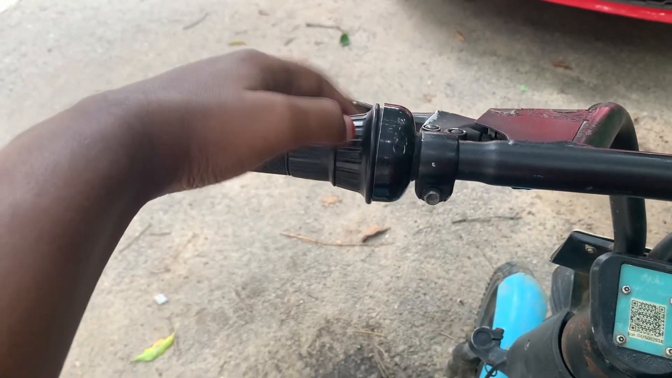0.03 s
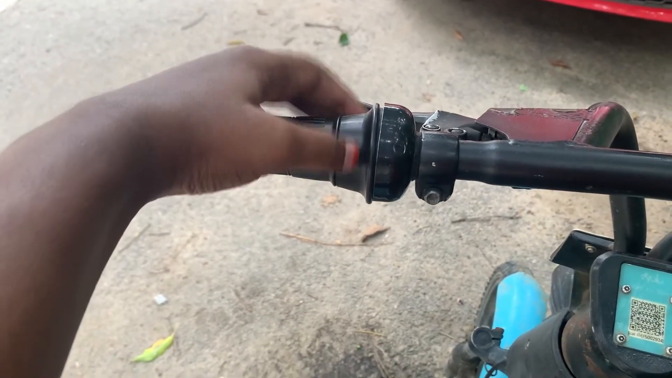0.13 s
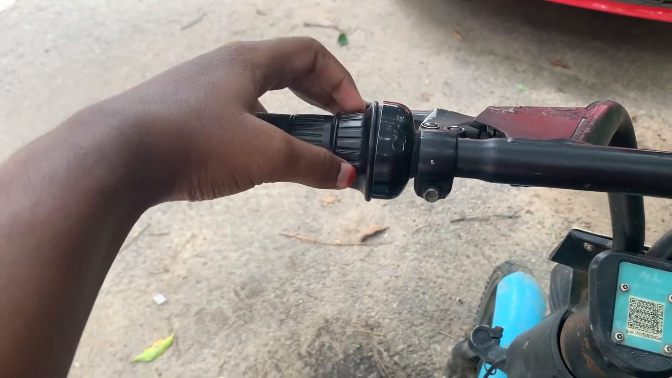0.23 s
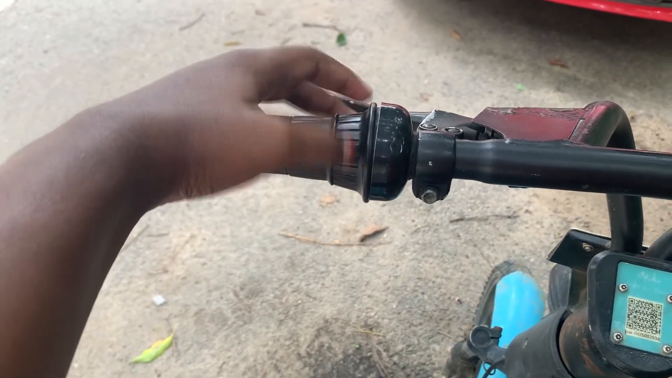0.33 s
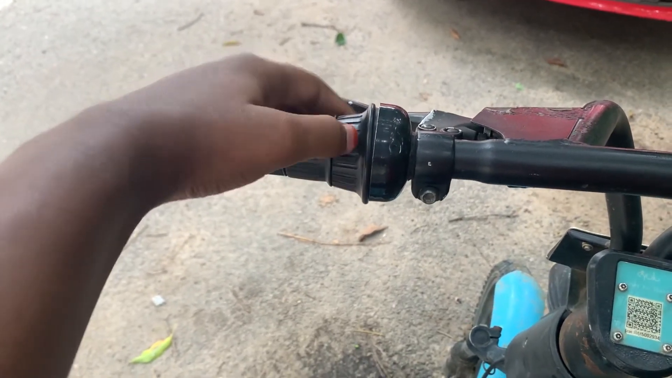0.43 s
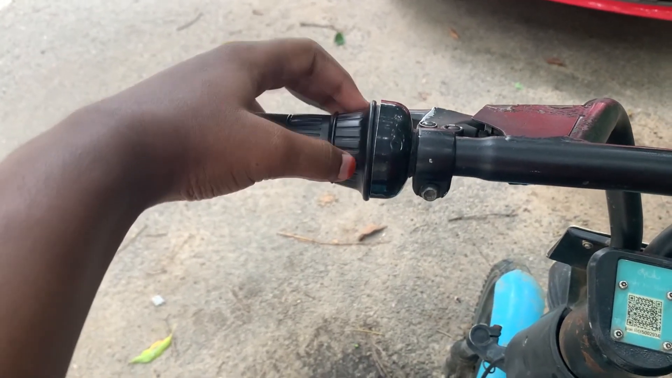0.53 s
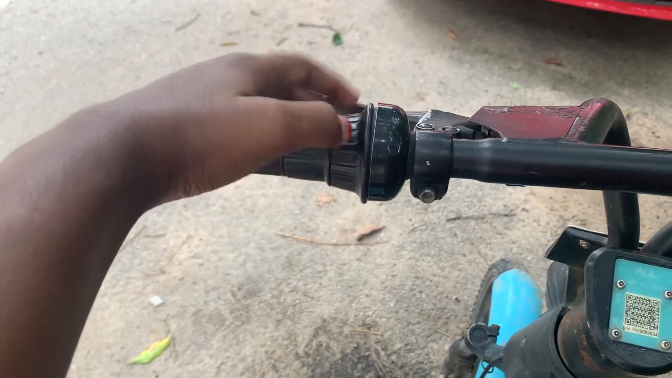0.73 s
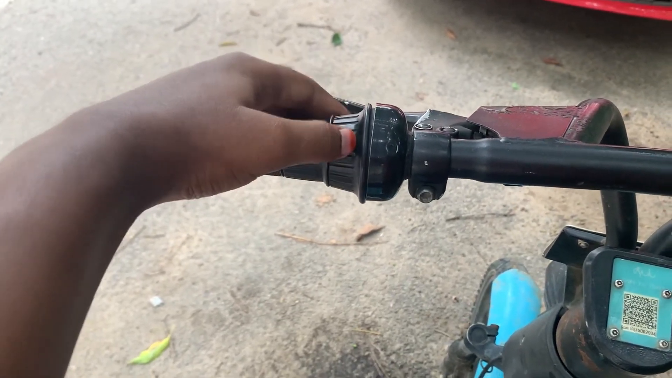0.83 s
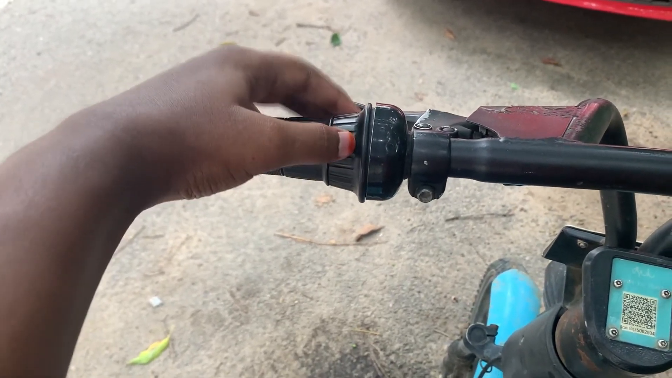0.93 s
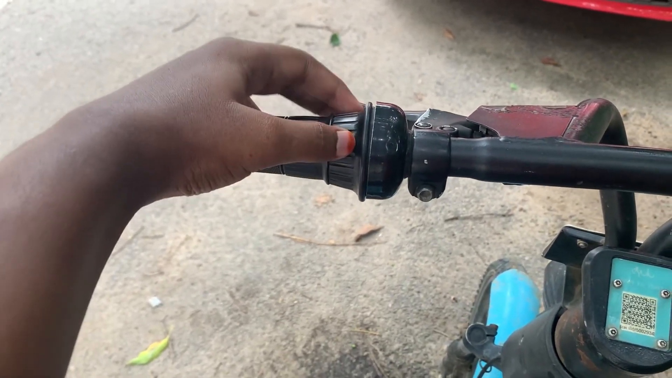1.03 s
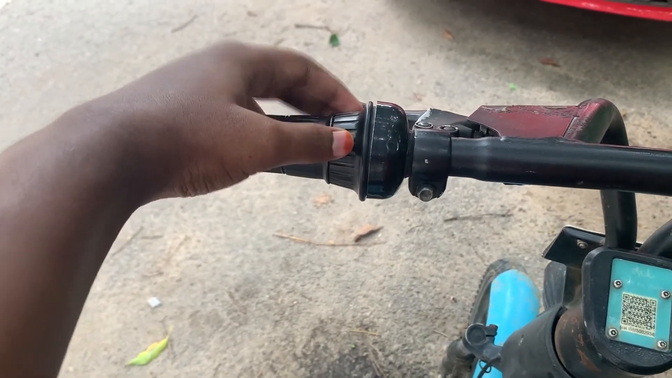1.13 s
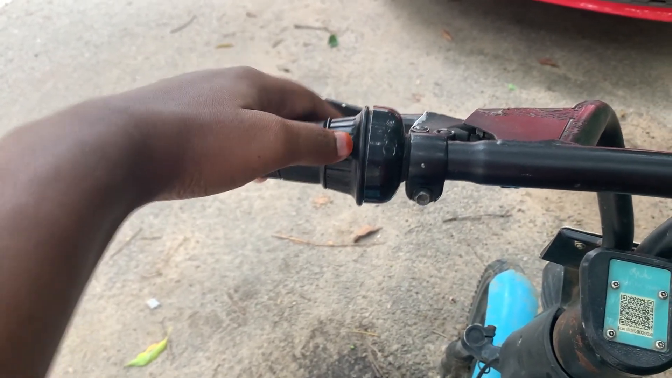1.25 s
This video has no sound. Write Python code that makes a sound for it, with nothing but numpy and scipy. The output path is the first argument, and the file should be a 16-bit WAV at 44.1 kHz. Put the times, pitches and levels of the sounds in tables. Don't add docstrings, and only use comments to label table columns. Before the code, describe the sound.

A small metal bicycle bell is struck twice, bright choked dings with ratchet clicks, outdoors

```python
import sys
import numpy as np
from scipy import signal
from scipy.fft import rfft, irfft
from scipy.io import wavfile

SR = 44100
rng = np.random.default_rng(int(sys.argv[2]) if len(sys.argv) > 2 else 0)


def output_pcm(signal):
    pcm = np.clip(np.atleast_2d(signal).T, -1, 1) * 32767
    wavfile.write(sys.argv[1], SR, np.round(pcm).astype(np.int16))


def boost(x):
    u = np.asarray(x, float) / 20
    return 10 ** u


N = 57330

# start_level_db, t60_s
FREE_RING = [(-68.5, 2), (-51.5, .8), (-54, .8), (-45, 0.87), (-39, 0.33), (-47, 0.17), (-48, 0.13),
             (-31.5, 0.17), (-53.5, .2), (-70.5, 0.26), (-66.5, .25), (-37, 0.078), (-52.5, .2), (-53, .15)]
FREE_RING_HZ = [1302, 3245, 3259, 5651, 5665, 8493, 8514, 11785, 11814, 11330, 12450, 15540, 15684, 7887]
FREE_RING_BEAT_S = [0, .012, .012, .012, .012, .024, .024, 0, 0, 0, 0, 0, 0, 0]
# frequency_hz, density_db (per Hz)
STREET_SPECTRUM = [(15, -36), (25, -8.5), (96, -1.5), (208, -23), (298, -36), (407, -20.5), (718, -28.5),
                   (2300, -29.5), (12000, -55.5), (15600, -90), (22000, -120)]
# frequency_hz, correlation
STREET_LIKENESS = [(40, 1), (150, 0.064), (400, 0.094), (1000, .1), (2500, -0.34), (6000, 1)]
# pitch_hz, level_db, start_s, length_s
MACHINE_HUMS = [(1920, -64, .9, .07), (1920, -73, 1.14, .09), (2265, -73, .98, .17), (1530, -78, 1.08, .15),
                (3440, -76, 1.23, .08)]
# time_s, bass_level_db
ENGINE_LEVEL = [(0, -2), (0.152, 0), (.3, -1), (0.699, -5.5), (.9, 2.5), (1.05, 6), (1.3, 1.5)]
# time_s, gain_db
BACKGROUND_GAIN = [(0, -9), (.06, -6), (.07, 1.5), (.21, 6), (.28, -17.5), (.48, -5), (.56, 3.5),
                   (.61, -10.5), (.93, -10), (.96, -1.5), (1.3, -1.5)]
# start_s, level_db
BIRD_CHIRPS = [(-.07, -59), (.49, -53.5), (1.052, -58.5)]
# start_s, crack_db, crack_t60_s, knock_hz, knock_db
CLATTER_HITS = [(0.1454, -65, .03, 2300, -48.5), (0.1817, -47.5, .02, 2200, -33.5),
                (0.1955, -48.5, 0.073, 7620, -62.5), (0.2009, -20.5, .06, 1100, -42),
                (0.2052, -37, .08, 1319, -38), (0.2143, -35, 0.12, 2100, -42),
                (.498, -93, .02, 2300, -85.5), (.538, -50, 0.022, 2200, -35.5),
                (0.553, -52, 0.0532, 6845, -56.5), (0.5529, -23, 0.051, 1000, -50),
                (0.556, -49.5, .06, 2000, -66.5), (.567, -38.5, .06, 1529, -32)]
# frequency_hz, density_db (per Hz)
CRACK_SPECTRUM = [(100, 0), (400, -8), (1300, -7.3), (3000, -4), (7600, -2.5), (9200, 0), (13000, 0.5),
                  (16500, -17), (18000, -53)]
# start_s, low_modes_db, mode_8khz_db, mode_12khz_db, mode_15khz_db
HAMMER_CONTACTS = [
    (.2016, -34, -21, -16, -9),
    (.2045, -31, -19, -12, -12),
    (.2155, -36, -22, -13, -10),
    (.5549, -37, -25, -17, -12),
    (.558, -32, -19, -11, -15),
    (.571, -46, -28, -25, -40),
]
# first_blow_hz, second_blow_hz, partner_hz
MODE_HZ = [(1317, 1337, 1290), (3235, 3270, 3300), (5664, 5668, 5716), (8505, 8494, 8540),
           (11782, 11812, 11860), (15553, 15540, 15680)]
# choked_t60_s, rise_s, level_db (within its group), partner_db
MODE_CHOKED = [(.07, 0.0026, -16.5, -26), (0.018, .002, -2.5, -11), (.06, .002, 3, -9.5),
               (0.035, 0.0022, 2, -13.5), (0.082, 0.00067, 1, -8), (0.043, 0.00042, 3, -15)]
# (0 low, 1 8 kHz, 2 12 kHz, 3 15 kHz)
MODE_GROUP = [0, 0, 0, 1, 2, 3]
MODE_RESIDUE_DB = [-34, -30, -32, -34, -43, -46]
MODE_RESIDUE_T60_S = [.4, .6, .6, .5, .4, .33]
# start_s, level_db
HANDLEBAR_THUDS = [
    (0.207, -40.5),
    (0.554, -45),
]
# frequency_hz, phase_rad
PORT_LAG = [(100, 0.), (1000, -1.1), (3250, -2.5), (5665, -1.6), (7200, 1.1), (8500, 2.85), (11800, 7.35),
            (15550, 12.25)]


def t_s():
    return np.arange(N) / SR


def rms_one(x):
    return x / np.sqrt(np.mean(x ** 2) + 1e-20)


def at_hz(points, hz):
    table_hz, value = np.transpose(points)
    return np.interp(np.log(np.maximum(hz, 1)), np.log(table_hz), value)


def decay(start_s, t60_s, rise_s):
    since = np.maximum(t_s() - start_s, 0)
    rise = 1 - np.exp(-since / max(rise_s, 1e-4))
    return rise * boost(-60 * since / t60_s)


def tone(hz):
    return np.sqrt(2) * np.sin(2 * np.pi * (hz * t_s() + rng.random()))


def coloured(spectrum):
    shape = boost(at_hz(spectrum, np.fft.rfftfreq(N, 1 / SR)))
    return rms_one(irfft(rfft(rng.standard_normal(N)) * shape, N))


def echoes(x, t60_s, rise_s):
    response = rng.standard_normal(N) * decay(0, t60_s, rise_s)
    response = response / np.sqrt(np.sum(response ** 2))
    return signal.fftconvolve(x, response)[:len(x)]


def drift(rate_hz):
    knots = rng.standard_normal(int(N / SR * rate_hz) + 3)
    return np.interp(t_s() * rate_hz, np.arange(len(knots)), knots)


def butter(x, hz, kind):
    return signal.sosfilt(signal.butter(2, hz, kind, fs=SR, output="sos"), x)


def ports(x):
    lag_hz, lag_rad = np.transpose(PORT_LAG)
    half_turn = np.exp(.5j * np.interp(np.fft.rfftfreq(2 * N, 1 / SR), lag_hz, lag_rad))
    spectrum = rfft(x, 2 * N)
    left, right = irfft(spectrum / half_turn), irfft(spectrum * half_turn)
    return np.array([left[:N], right[:N]])


def free_ring():
    choke_s, choked_t60_s = .2, .055
    ring = np.zeros(N)
    for hz, beat_s, (db, t60_s) in zip(FREE_RING_HZ, FREE_RING_BEAT_S, FREE_RING):
        partial = np.sqrt(2) * np.cos(2 * np.pi * hz * (t_s() - beat_s))
        ring += boost(db - 60 * t_s() / t60_s) * partial
    return ring * boost(-60 * np.maximum(t_s() - choke_s, 0) / choked_t60_s)


def machine_hums():
    out = np.zeros((2, N))
    for hz, db, start_s, length_s in MACHINE_HUMS:
        swell = np.clip(3 - 6 * abs((t_s() - start_s) / length_s - .5), 0, 1)
        out += boost(db + 1.4 * drift(30.5)) * swell * np.array([tone(hz), tone(hz)])
    return out


def street():
    level_db, patchy_db = -53.5, 5.0
    edges = 25 * 2 ** np.arange(0, 9.1, .5)
    white = rng.standard_normal((2, 2, N + SR))
    out = np.zeros((2, N))
    for k, (low, high) in enumerate(zip(edges, edges[1:])):
        mid, side = butter(white[k % 2], [low, high], "band")[:, SR:]
        hz = np.sqrt(low * high)
        alike = np.clip(at_hz(STREET_LIKENESS, hz), -1, 1)
        band = np.sqrt(1 + alike) * mid + np.sqrt(1 - alike) * side * [[1], [-1]]
        out += boost(at_hz(STREET_SPECTRUM, hz) + patchy_db * drift(14)) * band
    return boost(level_db) * rms_one(out) + machine_hums()


def bird():
    top_hz, end_hz, length_s, octave_db = 4900, 4200, .055, -17
    trees_t60_s, trees_rise_s, direct_db = .6, .02, -16
    lead = SR // 10
    u = np.linspace(0, 1, int(length_s * SR))
    phase = 2 * np.pi * np.cumsum(top_hz + (end_hz - top_hz) * u ** 2.0) / SR
    call = np.sin(np.pi * u) ** .5 * (np.sin(phase) + boost(octave_db) * np.sin(2 * phase))
    calls = np.zeros(N + lead)
    for start_s, db in BIRD_CHIRPS:
        i = int(start_s * SR) + lead
        calls[i:i + len(u)] += boost(db) * call
    trees = np.array([echoes(calls, trees_t60_s, trees_rise_s) for _ in range(2)])
    return (2 * trees + boost(direct_db) * calls)[:, lead:]


def ducked(x):
    bass_hz, bass_share = 130, 0.33
    gain_db = np.interp(t_s(), *np.transpose(BACKGROUND_GAIN))
    engine_db = np.interp(t_s(), *np.transpose(ENGINE_LEVEL))
    bass = signal.sosfiltfilt(signal.butter(2, bass_hz, fs=SR, output="sos"), x)
    return bass * boost(bass_share * gain_db + engine_db) + (x - bass) * boost(gain_db)


def clatter():
    grain_db, knock_share = 3, 0.55
    noise = np.array([coloured(CRACK_SPECTRUM), coloured(CRACK_SPECTRUM)])
    noise = noise * boost(grain_db * drift(700))
    power, knock = np.zeros(N), np.zeros(N)
    for start_s, crack_db, t60_s, knock_hz, knock_db in CLATTER_HITS:
        power += (boost(crack_db) * decay(start_s, t60_s, 0.0009)) ** 2
        knock += boost(knock_db) * decay(start_s, knock_share * t60_s, 0.00059) * tone(knock_hz)
    crack, crack_side = noise * np.sqrt(power)
    return crack + knock, butter(crack_side, 900, "high")


def struck_dome():
    second_blow_s, second_choke = .53, .7
    out = np.zeros(N)
    modes = zip(MODE_HZ, MODE_CHOKED, MODE_RESIDUE_DB, MODE_RESIDUE_T60_S, MODE_GROUP)
    for (hz1, hz2, partner_hz), (t60_s, rise_s, db, partner_db), residue_db, residue_t60_s, group in modes:
        power, residue_power = np.zeros(N), np.zeros(N)
        for start_s, *group_db in HAMMER_CONTACTS:
            blow_db = group_db[group] + db
            choke = second_choke if start_s > second_blow_s else 1
            power += (boost(blow_db) * decay(start_s, t60_s * choke, rise_s)) ** 2
            residue_power += (boost(blow_db + residue_db) * decay(start_s, residue_t60_s, .01)) ** 2
        main = np.where(t_s() > second_blow_s, tone(hz2), tone(hz1))
        residue = (.7 + .6 * drift(70)) * tone(hz1) + .6 * drift(70) * tone(hz1)
        out += np.sqrt(power) * (main + boost(partner_db) * tone(partner_hz))
        out += np.sqrt(residue_power) * residue
    return out


def thump():
    hz, t60_s, rise_s = 80, .09, .004
    out = np.zeros(N)
    for start_s, db in HANDLEBAR_THUDS:
        out += boost(db) * decay(start_s, t60_s, rise_s) * np.sin(2 * np.pi * hz * (t_s() - start_s))
    return out


def scene():
    yard_db, yard_t60_s, yard_side = -30, .4, .5
    background = ducked(ports(free_ring()) + bird() + street())
    crack, crack_side = clatter()
    bell = struck_dome() + crack
    near = ports(bell + boost(yard_db) * echoes(bell, yard_t60_s, .01))
    side = 1.2 * crack_side + boost(yard_db) * yard_side * echoes(bell, yard_t60_s, 0.0033)
    return near + side * [[1], [-1]] + thump() + background


def roll_off(x):
    return signal.sosfilt(signal.butter(12, 17480, fs=SR, output="sos"), x)


def record(dry):
    low_cut_hz, top_hz = 50, 16600
    x = butter(np.clip(dry, -1, 1), low_cut_hz, "high")
    top_cut = signal.cheby2(10, 60, min(top_hz * 1.05, .45 * SR), fs=SR, output="sos")
    return roll_off(signal.sosfilt(top_cut, x))


dry = scene()
out = record(dry)
output_pcm(out)
```